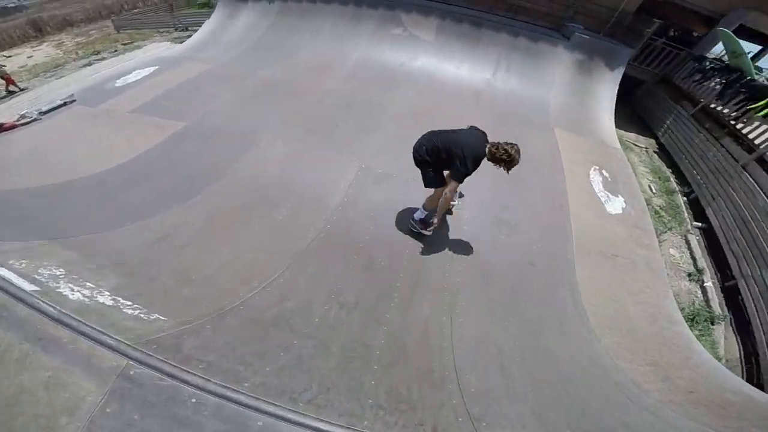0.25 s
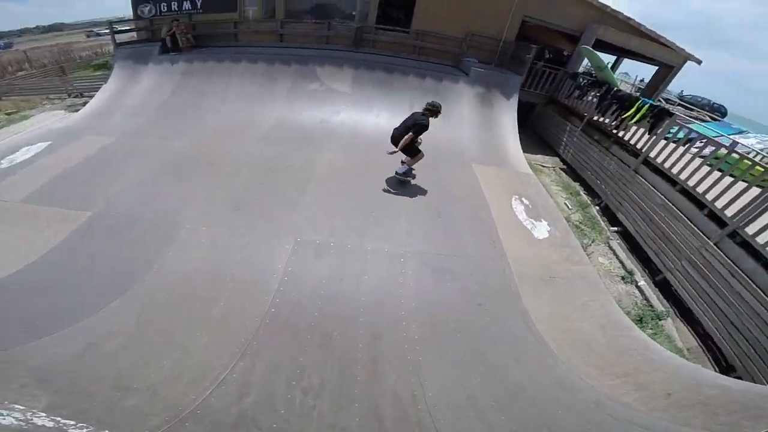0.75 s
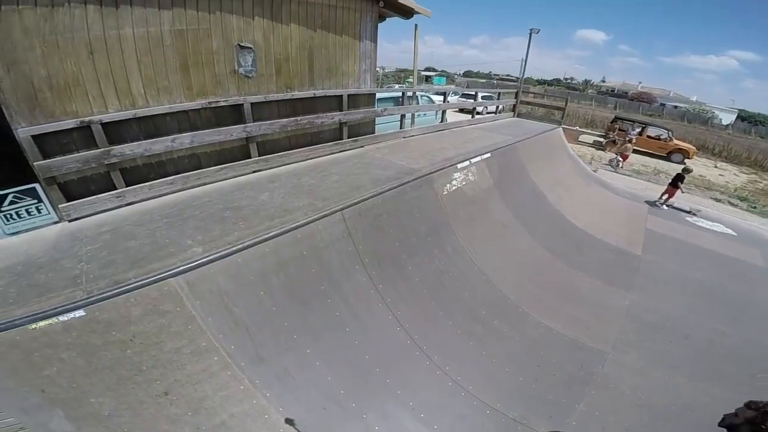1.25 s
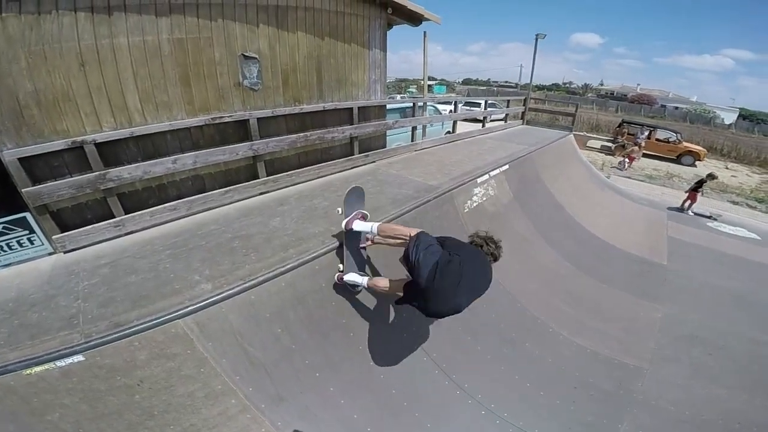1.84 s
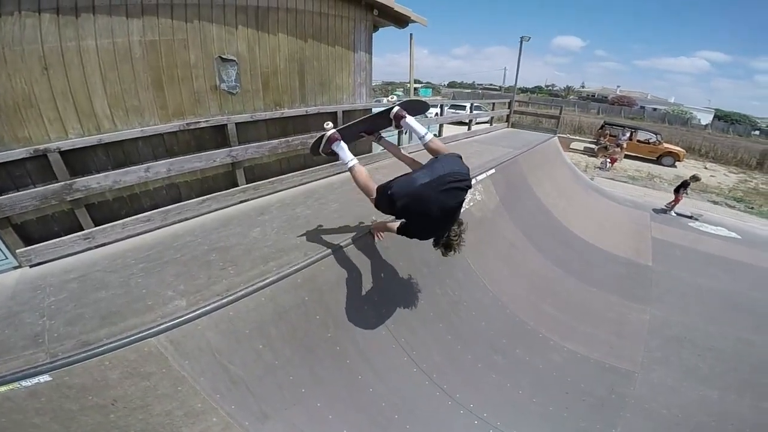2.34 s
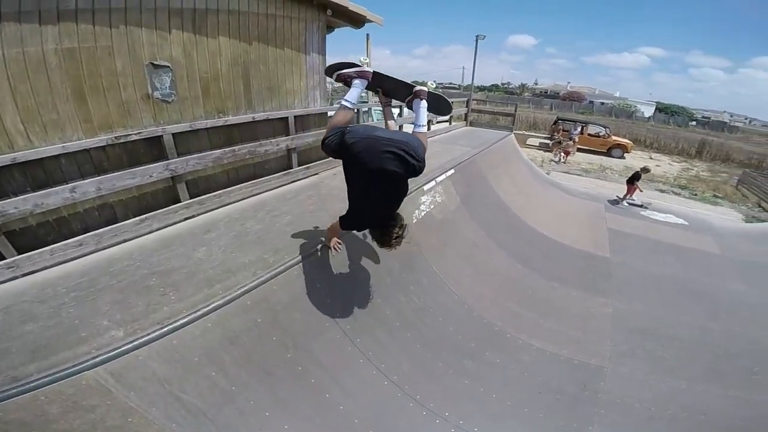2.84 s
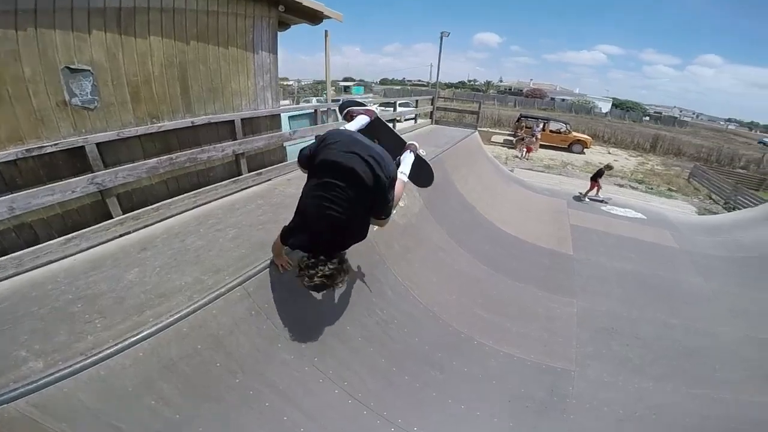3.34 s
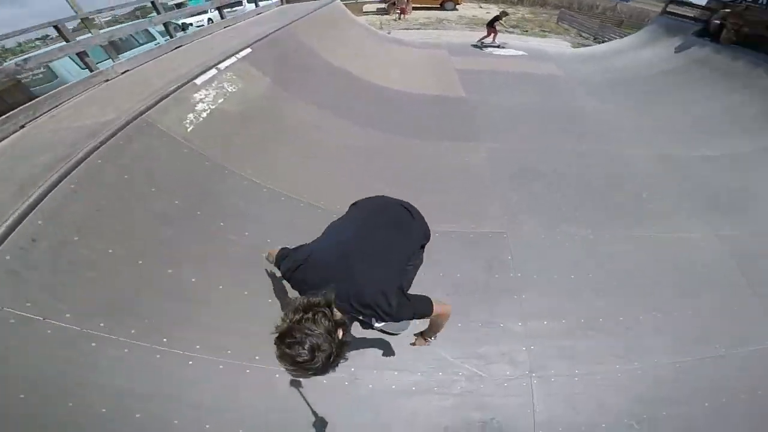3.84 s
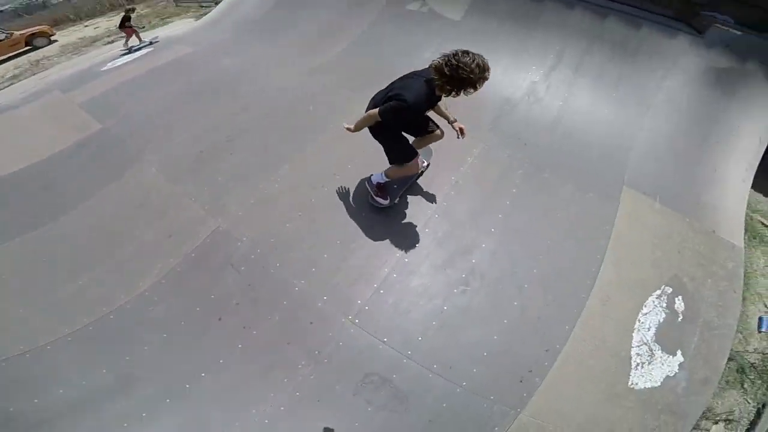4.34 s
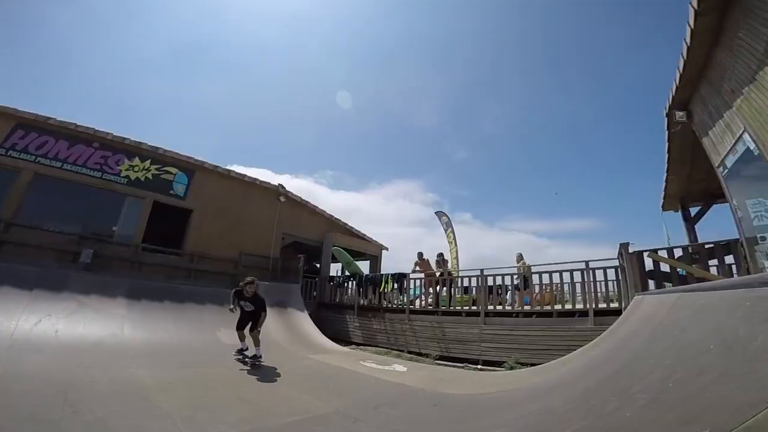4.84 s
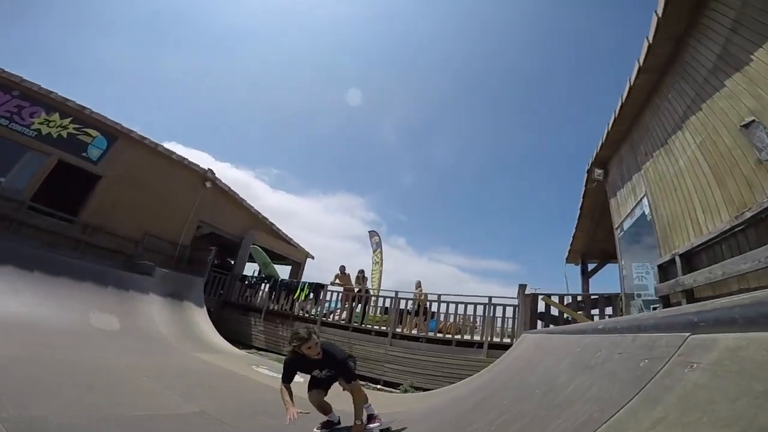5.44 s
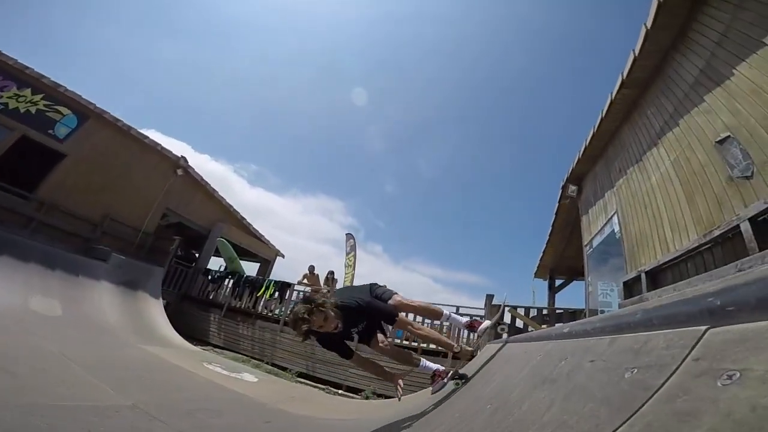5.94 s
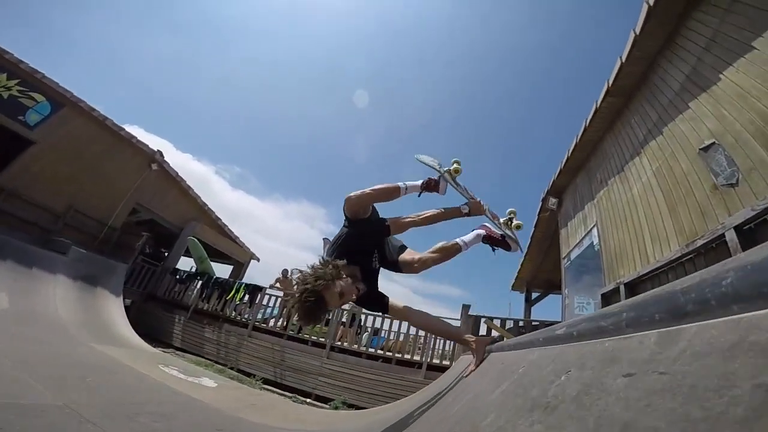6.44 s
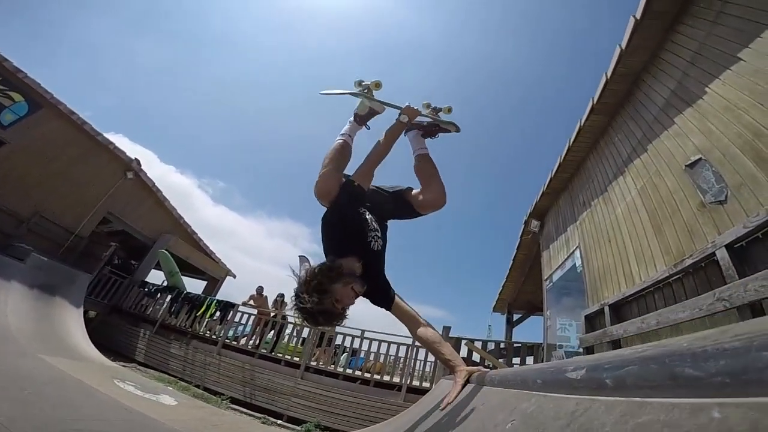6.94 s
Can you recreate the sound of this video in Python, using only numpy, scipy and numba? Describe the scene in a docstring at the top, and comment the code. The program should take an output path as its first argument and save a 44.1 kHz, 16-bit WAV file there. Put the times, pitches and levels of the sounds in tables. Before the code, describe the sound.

A skateboard rolls over a hollow wooden ramp outdoors, a low rumble under hissing wheels, knocking across the seams. The sound drops into slow motion, deeper and duller, and the rolling nearly vanishes. Normal speed returns with a loud landing clack and more rolling. A second slowed passage brings heavy knocks and a faint metal pipe ring before the wheels fade. Wind buffets the microphone throughout.

```python
"""A skateboard rolls over a hollow wooden ramp in the open air, with wind buffeting the microphone.
Surface bumps force the sheets and frame into vibration, a rumble beneath the hiss of the wheels.
Knocks at the seams launch bending waves, the trucks set a steel coping pipe ringing, and thin
squeaks pass. Time skips ahead twice, and two stretches run in slow motion: longer, lower and duller."""
import sys
import numpy as np
from scipy import signal
from scipy.fft import rfft, irfft
from scipy.io import wavfile
from scipy.ndimage import map_coordinates
from numba import njit

SR = 44100
rng = np.random.default_rng(int(sys.argv[2]) if len(sys.argv) > 2 else 0)


def int16_out(signal):
    """Quantize to a 16-bit WAV file."""
    q = np.round(np.clip(np.atleast_2d(signal).T, -1, 1) * 32767)
    wavfile.write(sys.argv[1], SR, q.astype(np.int16))


N = 316638

# Starts and times are as heard; frequencies and decay times are before slowing, unless marked as heard.
# Levels are relative; T60 is the time to decay by 60 dB.
# Stretches of time. Each row: start in seconds, speed as a ratio, time skipped in seconds.
STRETCHES = [(0, 1, 0), (1.0635, 1, .2), (1.942, .357, 0), (3.348, 1, 0), (4.876, 1, .2), (5.544, .373, 0)]
# Rolling, one curve a stretch. Each row: time in seconds, sheet drumming in dB, wheel hiss in dB.
ROLL_LEVELS = [
    [(0.0, -21, -32), (0.088, -32.5, -54), (0.182, -43.5, -56), (0.318, -34.5, -51.5),
     (0.496, -30.5, -48.5), (0.842, -32, -46.5), (1.062, -28.5, -42)],
    [(1.065, -27, -40), (1.207, -22.5, -41), (1.323, -23.5, -42.5), (1.461, -25.5, -43),
     (1.607, -24.5, -41.5), (1.753, -27.5, -37.5), (1.94, -26, -36.5)],
    [(3.35, -42, -47), (3.404, -48, -48.5), (3.562, -44.5, -49), (3.896, -38.5, -55), (4.074, -33, -51),
     (4.304, -29.5, -48), (4.67, -29.5, -49), (4.874, -27.5, -45.5)],
    [(4.878, -32.5, -43), (4.934, -23, -40), (5.064, -24, -39), (5.32, -25, -41.5), (5.378, -20, -42),
     (5.496, -22, -39.5), (5.542, -25, -39.5)],
    [(1.946, -16.5, -38), (2.046, -32, -44), (2.104, -25, -29.5), (2.334, -27.5, -41.5), (2.47, -45, -47.5),
     (2.568, -44.5, -48), (2.942, -41.5, -46.5), (3.188, -45.5, -48.5), (3.345, -43, -44.5)],
    [(5.548, -26, -39), (5.842, -25, -38), (6.06, -25, -38.5), (6.302, -32.5, -47.5), (6.416, -27, -35),
     (6.534, -32, -42), (6.656, -36.5, -50), (6.824, -44.5, -52), (7.18, -44, -50.5)],
]
# Rolling timbre. Each row: start in seconds, opening balance, closing balance. Each balance: sheet
# resonance in Hz, boom over drumming in dB, growl over hiss in dB, grit over hiss in dB.
ROLL_BALANCE = [(0, (384, -1.5, 2, -17), (373, -0.5, 2.5, -16.5)), (1.064, (370, 0.5, -1, -8),
                (500.5, -2, -2, -12.5)), (1.944, (420, -2, 3.5, -10.5), (289.5, 1, -3.5, -23)),
                (3.348, (434, -6, 0, -11), (389.5, 0.5, 2.5, -13.5)), (4.875, (360, -4.5, -1.5, -5.5),
                (386, -1, 4, -8)), (5.544, (425.5, -4, 3, -9), (313.5, 2, -4, -2.5))]
# Noise spectra of frame, wheels, wind, microphone and impacts.
# Each row: frequency in Hz, spectral density in dB.
BOOM_SPECTRUM = [(50, -28), (90, -1), (140, -1.5), (230, -6), (400, -10), (800, -81.5)]
GROWL_SPECTRUM = [(410, -43.5), (700, 1), (758, -5), (1030, -2), (1150, -2.5), (1280, -3), (2000, -3),
                  (2600, -38.5), (4400, -120)]
HISS_SPECTRUM = [(1120, -29.5), (1900, 7), (2710, 3), (3250, 1), (3510, -6), (4050, -4), (4860, -3),
                 (5820, -11.5), (6370, -16), (8000, -26.5), (10400, -53.5), (17600, -120)]
GRIT_SPECTRUM = [(3820, -6), (6500, -6.5), (8410, -18), (9250, -17), (11300, -21), (12800, -19.5),
                 (14700, -24), (15500, -28)]
WIND_SPECTRUM = [(10, -6.5), (18, -1), (30, 1), (60, -0.5), (120, -13.5), (250, -24), (600, -49),
                 (1500, -80)]
SELF_NOISE_SPECTRUM = [(4410, -30.5), (7500, -6.5), (9640, -10.5), (13700, -14.5), (14500, -7.5),
                       (15300, -29.5)]
CRACK_SPECTRUM = [(410, -29), (700, -4), (942, -0.5), (1350, -6), (1780, -5), (2040, -9), (2770, -3),
                  (3230, -8.5), (3560, -15.5), (4340, -13), (6000, -26.5), (7800, -68), (13200, -120)]
# Wind on the microphone. Each row: time in seconds, level in dB.
WIND_LEVELS = [(0, -11.5), (.12, -20.5), (.4, -36), (.69, -26), (.87, -35), (1.06, -21), (1.07, -14),
               (1.18, -19.5), (1.4, -7.5), (1.52, -18), (1.61, -9.5), (1.73, -27.5), (1.94, -5.5),
               (2.05, -22.5), (2.23, -11.5), (2.36, -17.5), (2.46, -15), (2.55, -26), (2.75, -15),
               (2.95, -12.5), (3.17, -26), (3.35, -27.5), (3.5, -16.5), (3.7, -25.5), (3.76, -15.5),
               (3.98, -38.5), (4.07, -21), (4.19, -22), (4.3, -21), (4.5, -13.5), (4.61, -19),
               (4.76, -15.5), (4.88, -28.5), (5.22, -35), (5.31, -19), (5.55, -24.5), (5.79, -14),
               (5.93, -25), (6.22, -28), (6.32, -8.5), (6.45, -24.5), (6.8, -17), (6.92, -19), (7.1, -17),
               (7.18, -30)]
# Blows of wheels and board. Each row: start in seconds, drumming in dB, nominal pitch as heard in Hz,
# thump in dB, crack in dB, treble in dB, T60 of the tail in seconds.
IMPACTS = [(.004, -16, 328, -23, -19.5, -26.5, 0.26), (.031, -8.5, 426, -15, -20.5, -49, 0.04),
           (.201, -12, 343, -15.5, -24, -41, 0.11), (.331, -12, 342, -24, -48, -60, 0.11),
           (.425, -16.5, 300, -13, -31.5, -59, 0.071), (.471, -30, 261, -19, -54, -63, .06),
           (.519, -14.5, 400, -15.5, -33.5, -41, 0.13), (1.146, -12, 365, -40, -31, -46, 0.11),
           (1.44, -4.5, 490, -7.5, -23, -52, 0.085), (1.457, -27, 395, -29, -27.5, -51, 0.15),
           (1.518, -1, 510, -0.5, -16.5, -54, 0.037), (1.532, -36, 260, -17, -21, -55, 0.27),
           (1.9, 3.5, 462, -2.5, -15.5, -29, 0.093), (2.017, -0.5, 206, -7.5, -18, -35.5, 0.11),
           (2.038, -9, 188.5, -18, -15, -33.5, 0.037), (2.093, -25, 208, -26, -16.5, -36, 0.03),
           (2.115, -11, 165, -14, -11.5, -44, 0.046), (3.458, -12, 98, -11, -55, -65, 0.033),
           (3.478, -18.5, 107, -14, -56, -70, 0.094), (3.606, -12, 423, -8.5, -37, -60, 0.034),
           (3.712, 3, 508, 9, -7, -39, 0.043), (3.731, -3, 439, -5, -17, -27, 0.098),
           (3.748, -10.5, 418, -15.5, -23.5, -34, 0.25), (4.155, -7, 425, -4, -31, -65, 0.062),
           (4.177, -24, 432, -15, -50, -41, 0.083), (4.245, -6, 430, -12, -29, -54, 0.083),
           (4.273, -9.5, 437, -14, -35, -59, 0.032), (4.359, -11, 410, -21, -53, -53, .04),
           (4.469, -5.5, 62, -29, -60, -68, 0.025), (4.588, -18, 294, -7.5, -39, -42, 0.056),
           (4.675, -12, 460, -11.5, -33, -42, 0.063), (5.288, -14, 424, -21, -18, -47, 0.17),
           (5.291, 0, 353, -12, -33, -50, 0.066), (5.359, -5, 392, -11, -15, -43, .12),
           (5.435, -3.5, 343, -29, -35, -50, 0.022), (5.491, -13, 412, -28, -23, -54, 0.048),
           (6.243, 3.5, 182, 0.5, -24, -33, 0.062), (6.259, -6, 123, -14.5, -14, -23, .12),
           (6.292, -9.5, 75.6, 3, -21.5, -47, 0.05), (6.344, -10, 81, -17, -23, -24, 0.061),
           (6.354, -18, 150, -14, -23, -25.5, 0.091), (6.387, -11, 75.6, -12, -19.5, -38, .05)]
# Reflections of the bending wave from the joists. Each row: delay in seconds, gain in dB.
JOIST_ECHOES = [(.0043, -15.5), (.0097, -12), (0.0169, -15.5)]
# Modes of deck and trucks. Each row: frequency in Hz, level in dB, T60 in seconds.
BOARD_MODES = [(1196, 2.5, 0.006), (1876, -5, 0.0057), (2580, -12, 0.032)]
# Squeaks as heard; the long row at 5.56 s is instead the whine of a wheel bearing. Each row: start and length
# in seconds, first and last pitch in Hz, level in dB.
SQUEAK_GLIDES = [(.12, 0.042, 2640, 2660, -51), (3.105, 0.127, 1910, 1815, -53.5),
                 (3.14, 0.053, 1660, 1590, -54.5), (3.22, 0.042, 1460, 1430, -53),
                 (3.28, .065, 1650, 1520, -54.5), (3.35, 0.079, 4150, 3470, -54),
                 (3.47, 0.055, 4300, 3900, -53.5), (3.53, .022, 3930, 3880, -53),
                 (4.225, 0.11, 4520, 4430, -54.5), (4.33, .05, 6400, 6400, -62),
                 (4.362, 0.038, 5420, 5140, -49.5), (4.395, .028, 4500, 3830, -52.5),
                 (4.43, 0.044, 4020, 3850, -52.5), (4.48, .025, 3750, 4500, -52),
                 (4.505, 0.0245, 3450, 3380, -54), (5.56, .64, 1800, 1902, -52.5),
                 (6.75, 0.14, 1760, 1710, -58.5)]
# Trucks striking the coping. Each row: start in seconds, low modes in dB, upper modes in dB.
COPING_STRIKES = [(2.116, -46, -59.5), (6.256, -32, -41), (6.351, -44, -33), (6.385, -53, -44)]
# Modes of the steel pipe, in close groups. Each row: frequency in Hz, level in dB, T60 in seconds.
PIPE_MODES = [(2722, 0, .75), (2738, -3, .9), (2768, 0, .28), (7560, -6, .1), (7635, 0, .3), (7668, -2, .4),
              (7705, -4, .2), (7800, -5, .12), (7900, -7, .1), (14440, -16, .15)]


def from_db(db):
    """Amplitude ratio of a level in decibels."""
    return 10 ** (np.asarray(db) / 20)


def unit_rms(x):
    """Normalisation to unit mean power."""
    return x / np.sqrt(np.mean(x ** 2) + 1e-20)


def time_map():
    """Time scaling: the speed at each heard sample and its integral, the position in real time."""
    speed, step = np.ones(N), np.ones(N)
    for start_s, rate, skip_s in STRETCHES:
        first = round(start_s * SR)
        speed[first:] = step[first:] = rate
        step[first] += skip_s * SR
    return speed, np.cumsum(step) - 1


def real_sample(heard_s):
    """The sample of real time that sounds at a heard instant."""
    _, position = time_map()
    return position[np.round(np.asarray(heard_s) * SR).astype(int)].astype(int)


def in_real_time(rows):
    """Linear interpolation of rows given in heard seconds: one curve a column, along real time."""
    _, position = time_map()
    heard_s = np.interp(np.arange(N), position, np.arange(N) / SR)
    times, *columns = np.transpose(sorted(rows))
    return [np.interp(heard_s, times, column) for column in columns]


def colour(x, spectrum):
    """Minimum-phase filtering by the folded cepstrum; white noise keeps its power."""
    hz, db = np.transpose(spectrum)
    bin_hz = np.maximum(np.arange(4097) * SR / 8192, 1)
    gain_db = np.interp(np.log(bin_hz), np.log(hz), db, left=db[0] - 20, right=db[-1] - 20)
    cepstrum = irfft(gain_db * np.log(10) / 20)
    fold = np.r_[1, 2 * np.ones(4095), 1, np.zeros(4095)]
    pulse = irfft(np.exp(rfft(cepstrum * fold)))
    return signal.fftconvolve(x, pulse / np.linalg.norm(pulse))[:N]


def noise(spectrum):
    """Gaussian noise of about unit power, shaped to a spectrum."""
    return colour(rng.standard_normal(N), spectrum)


def drift(corner_hz):
    """Random modulation: low-passed noise of unit rms."""
    hop = 40
    pole = np.exp(-2 * np.pi * corner_hz * hop / SR)
    slow = signal.lfilter([1], [1, -2 * pole, pole * pole], rng.standard_normal(N // hop + 2002))[2000:]
    return np.interp(np.arange(N) / hop, np.arange(len(slow)), unit_rms(slow))


def ring(clicks, hz, t60):
    """A damped mode: each impulse excites an exponentially decaying sine."""
    r, w = from_db(-60 / (t60 * SR)), 2 * np.pi * hz / SR
    return signal.lfilter([0, np.sin(w)], [1, -2 * r * np.cos(w), r * r], clicks + 1e-18)


@njit
def resonance(x, hz, width_hz):
    """A two-pole resonator whose centre frequency varies with time."""
    y, r = np.zeros(len(x)), np.exp(-np.pi * width_hz / SR)
    for i in range(2, len(x)):
        y[i] = x[i] - x[i - 2] + 2 * r * np.cos(2 * np.pi * hz[i] / SR) * y[i - 1] - r * r * y[i - 2]
    return y


def roughness(per_s, spread_db):
    """Surface roughness as shot noise: dense random impulses of uneven size."""
    sizes = from_db(spread_db * np.minimum(rng.exponential(1, N), 5)) * rng.choice([-1, 1], N)
    return unit_rms(sizes * (rng.random(N) < per_s / SR))


def rolling_balance():
    """Piecewise linear timbre: a glide through each stretch, then a quick step to the next."""
    ends = [row[0] - .003 for row in ROLL_BALANCE[1:]] + [N / SR]
    rows = []
    for (start_s, opening, closing), end_s in zip(ROLL_BALANCE, ends):
        rows += [(start_s, *opening), (end_s, *closing)]
    return in_real_time(rows)


def rolling():
    """Forced vibration: bumps shake the hollow frame and the sheet; finer grain hisses at the wheels."""
    drum_db, hiss_db = in_real_time(sum(ROLL_LEVELS, []))
    drum_hz, boom_db, growl_db, grit_db = rolling_balance()
    rolling_lead_db = 15.5   # drumming over hiss while the wheels roll
    growl_db += 0.22 * (drum_db - hiss_db - rolling_lead_db)   # fades with the drumming as they lift
    bumps, grain = drift(17.6), roughness(per_s=9000, spread_db=1.44)
    boom = noise(BOOM_SPECTRUM) * from_db(drum_db + boom_db + 0.72 * bumps)
    sheet = resonance(roughness(per_s=4000, spread_db=1.6), drum_hz, width_hz=180.0)
    sheet = resonance(sheet, drum_hz, width_hz=280.0)
    drum = unit_rms(sheet) * from_db(drum_db + 2.0 * bumps)
    growl = colour(grain, GROWL_SPECTRUM) * from_db(hiss_db + growl_db + 1.8 * bumps + 1.4 * drift(30))
    hiss = colour(grain, HISS_SPECTRUM) * from_db(hiss_db + bumps + 0.56 * drift(40))
    grit = noise(GRIT_SPECTRUM) * from_db(hiss_db + grit_db + bumps + 1.3 * drift(40))
    return boom + drum + growl + hiss + grit


def microphone_hiss():
    """Self-noise: the microphone adds a faint, stationary hiss."""
    return noise(SELF_NOISE_SPECTRUM) * from_db(-69.5)


def wind():
    """Turbulent pressure acts on the microphone port; the slowest swings leak away."""
    level_db, = in_real_time(WIND_LEVELS)
    pressure = noise(WIND_SPECTRUM) * from_db(level_db + 2.0 * drift(4.3))
    return signal.sosfilt(signal.butter(2, 14.0, "high", fs=SR, output="sos"), pressure)


def knocks():
    """Impact excitation: a blow launches a dispersive bending wave, thumps the frame and rattles."""
    touch_rise_s, touch_t60, rattle_share, cycles_to_peak = 0.00052, 0.0093, 0.38, 1.654
    speed, _ = time_map()
    age = np.arange(SR // 2) / SR
    phases = rng.uniform(0, 2 * np.pi, len(IMPACTS))
    wave, touches, thump_gain, sheet_gain, crack_gain, treble_gain = np.zeros((6, N))
    for (start_s, drum_db, heard_hz, thump_db, crack_db, treble_db, t60), phase in zip(IMPACTS, phases):
        first = real_sample(start_s)
        span = slice(first, first + len(age))
        drum_hz = heard_hz / speed[round(start_s * SR)]
        peak_s = cycles_to_peak / drum_hz
        # Dispersion: high frequencies travel faster and arrive first.
        falling_hz = drum_hz * (0.7295 + 0.834 * np.exp(-age / (1.437 * peak_s)))
        carrier = np.sin(phase + 2 * np.pi * np.cumsum(falling_hz) / SR)
        packet = age / peak_s * np.exp(1 - age / peak_s)
        wave[span] += from_db(drum_db - 4) * packet * carrier
        # The lows build slowly and linger.
        swell = (1 - np.exp(-age / 0.0061)) * from_db(-60 * age / (1.014 * t60))
        thump_gain[span] += from_db(thump_db + 3) * swell
        sheet_gain[span] += from_db(drum_db - 23) * swell
        # A sharp first touch, then the dying rattle.
        snap = from_db(-60 * age / touch_t60) + rattle_share * from_db(-60 * age / t60)
        snap *= 1 - np.exp(-age / touch_rise_s)
        crack_gain[span] += from_db(crack_db + 1) * snap
        treble_gain[span] += from_db(treble_db - 2) * snap * from_db(-60 * age / 0.36)
        touches[first] = from_db(crack_db)
    for delay_s, echo_db in JOIST_ECHOES:
        delay = round(delay_s * SR)
        wave[delay:] += from_db(echo_db) * wave[:-delay]
    sheet = unit_rms(resonance(rng.standard_normal(N), np.full(N, 420.0), width_hz=330.0)) * sheet_gain
    crack = colour(rng.standard_normal(N) * crack_gain, CRACK_SPECTRUM)
    treble = colour(rng.standard_normal(N) * treble_gain, GRIT_SPECTRUM)
    thump = noise(BOOM_SPECTRUM) * thump_gain
    board = sum(from_db(mode_db) * ring(touches, hz, t60) for hz, mode_db, t60 in BOARD_MODES)
    return wave + thump + sheet + board + crack + treble


def squeaks():
    """Random frequency and amplitude modulation roughens thin, gliding tones that swell and fade."""
    speed, _ = time_map()
    waver, flutter = 1 + 0.023 * drift(150), unit_rms(.2 + drift(220))
    out = np.zeros(N)
    for start_s, length_s, first_hz, last_hz, level_db in SQUEAK_GLIDES:
        span = slice(*real_sample([start_s, start_s + length_s]))
        progress = np.linspace(0, 1, span.stop - span.start)
        heard_hz = (first_hz + (last_hz - first_hz) * progress) * waver[span]
        tone = np.sin(2 * np.pi * np.cumsum(heard_hz / speed[round(start_s * SR)]) / SR)
        swell = np.abs(np.sin(np.pi * progress)) ** 0.2
        out[span] += from_db(level_db + 7.5) * swell * flutter[span] * tone
    return out


def coping():
    """Free vibration: the struck steel pipe rings on, and its closely spaced modes beat."""
    start_s, low_db, upper_db = np.transpose(COPING_STRIKES)
    out = np.zeros(N)
    for hz, mode_db, t60 in PIPE_MODES:
        strikes = np.zeros(N)
        strikes[real_sample(start_s)] = from_db((low_db if hz < 5000 else upper_db) + mode_db)
        out += ring(strikes, hz, t60)
    return out


def scene():
    """Superposition: all sources add in one channel, along real time."""
    return (rolling() + microphone_hiss() + wind() + knocks() + squeaks() + coping())[None]


def record(dry):
    """Saturation rounds the peaks; band-limited resampling then skips and slows time, lowering pitch."""
    ceiling, cutoff_hz = .99, 15200
    lowpass = signal.ellip(10, .3, 70, cutoff_hz, fs=SR, output="sos")
    saturated = ceiling * np.tanh((np.abs(dry[0]) / ceiling) ** 3) ** (1 / 3) * np.sign(dry[0])
    oversampled = signal.resample_poly(signal.sosfilt(lowpass, saturated), 4, 1, window=("kaiser", 10))
    _, position = time_map()
    heard = map_coordinates(oversampled, [4 * position], order=3)
    quantisation_noise = from_db(-97) * rng.standard_normal(N)
    return signal.sosfilt(lowpass, heard + quantisation_noise)[None]


dry = scene()
out = record(dry)
int16_out(out)
```